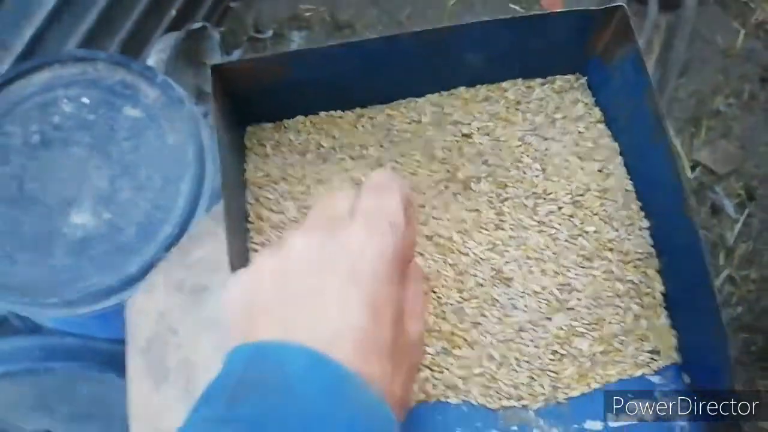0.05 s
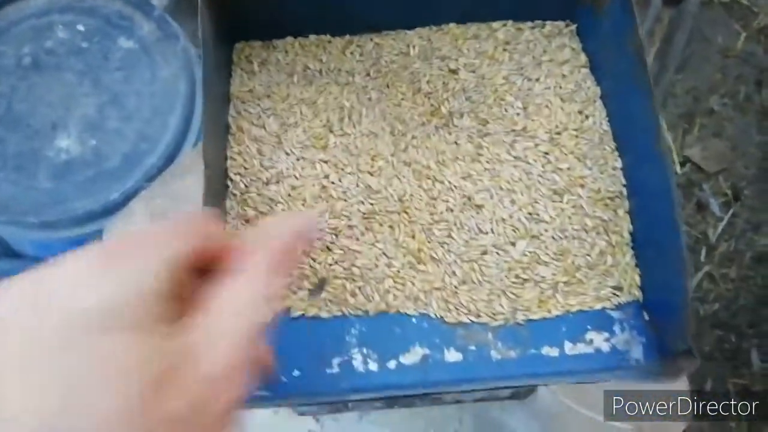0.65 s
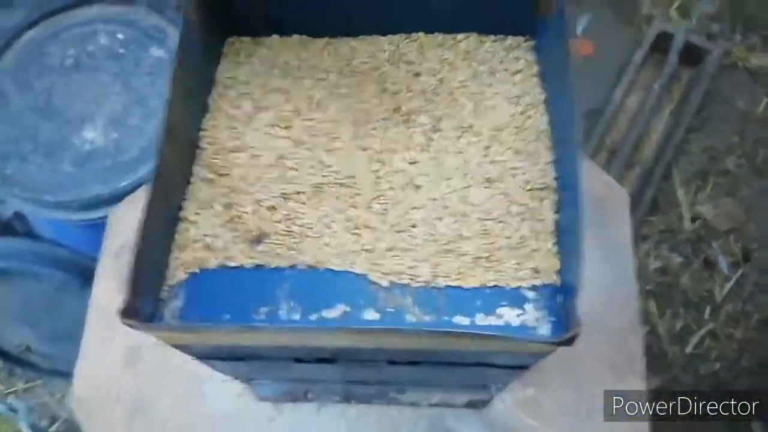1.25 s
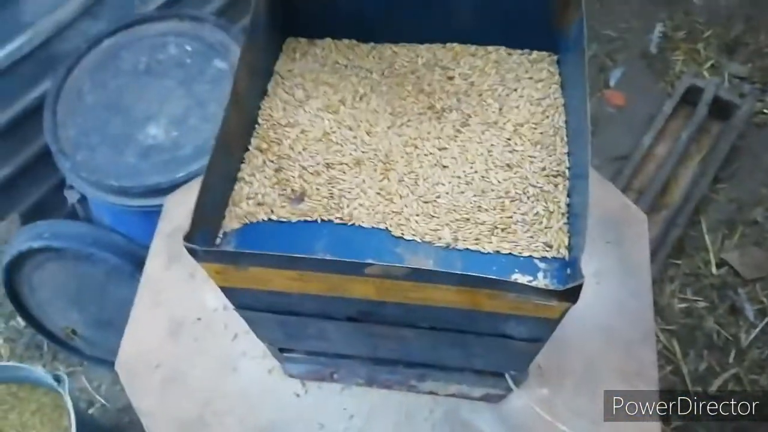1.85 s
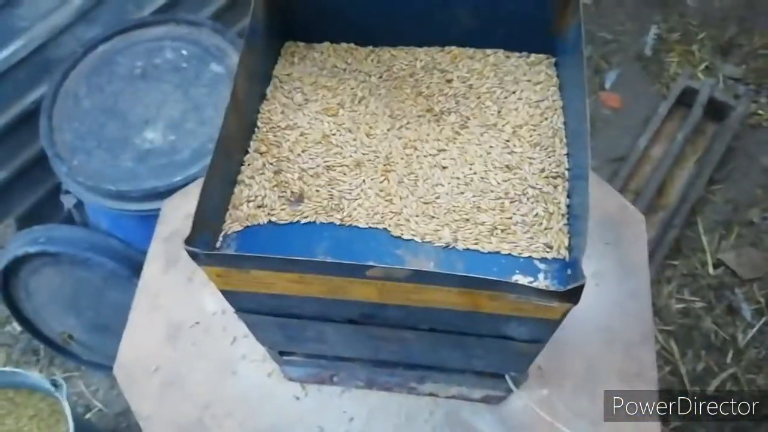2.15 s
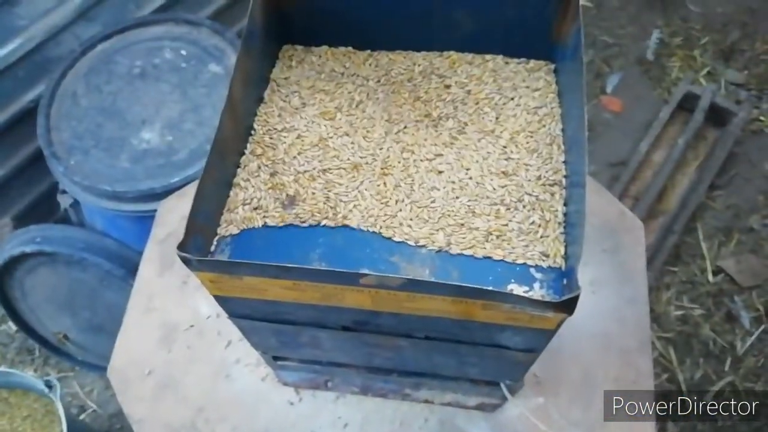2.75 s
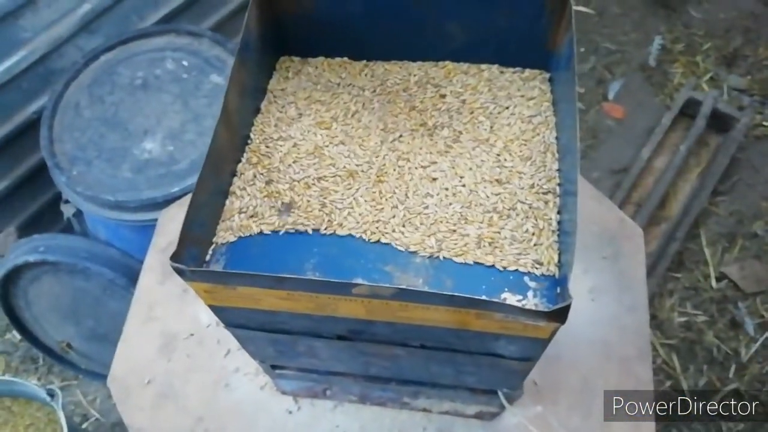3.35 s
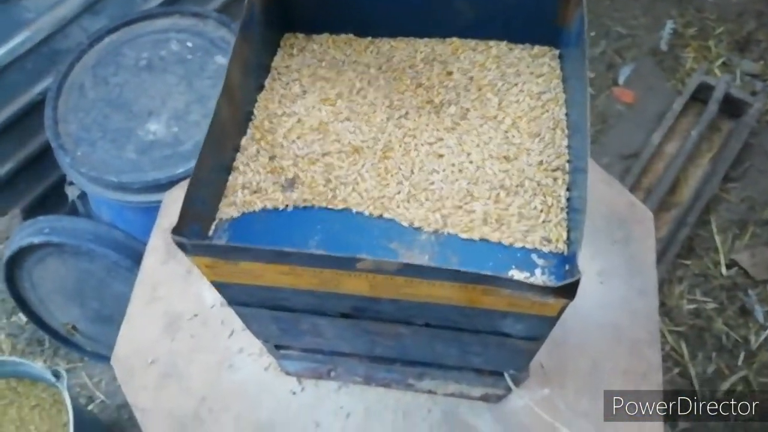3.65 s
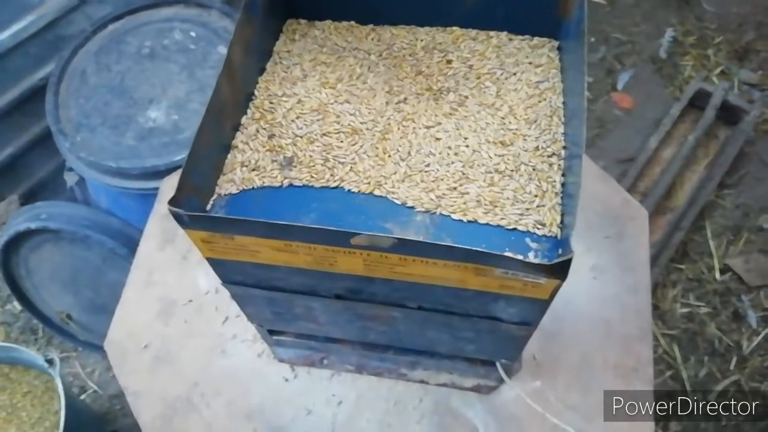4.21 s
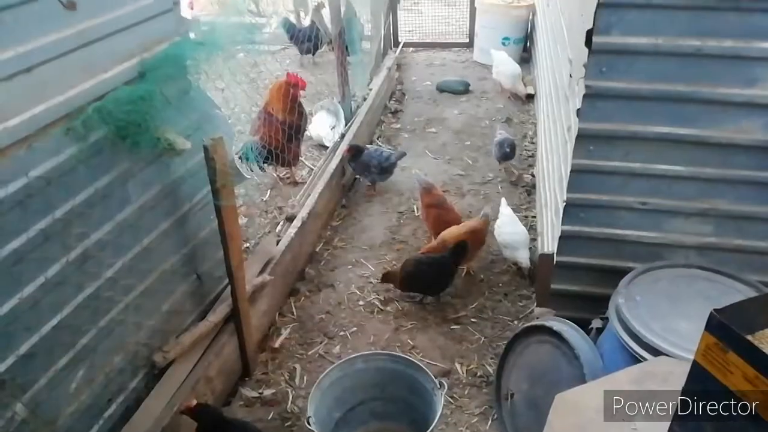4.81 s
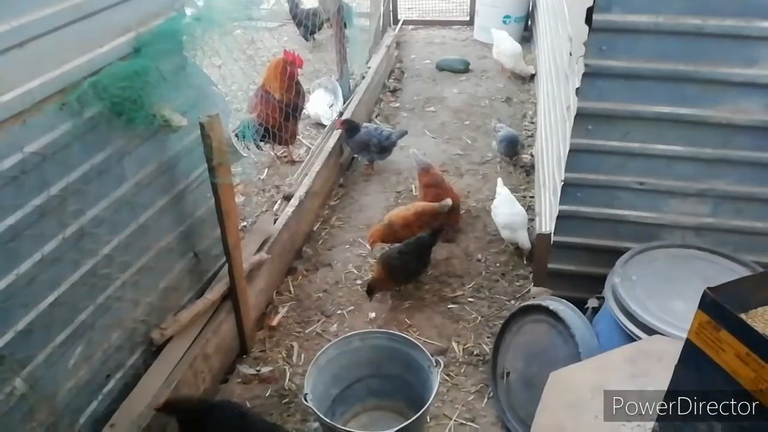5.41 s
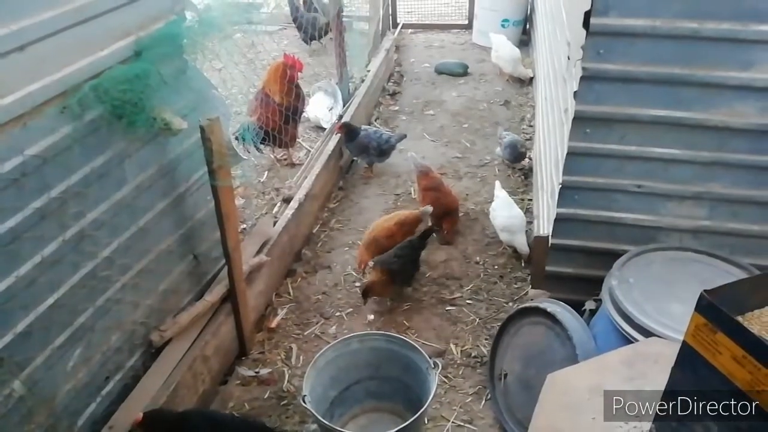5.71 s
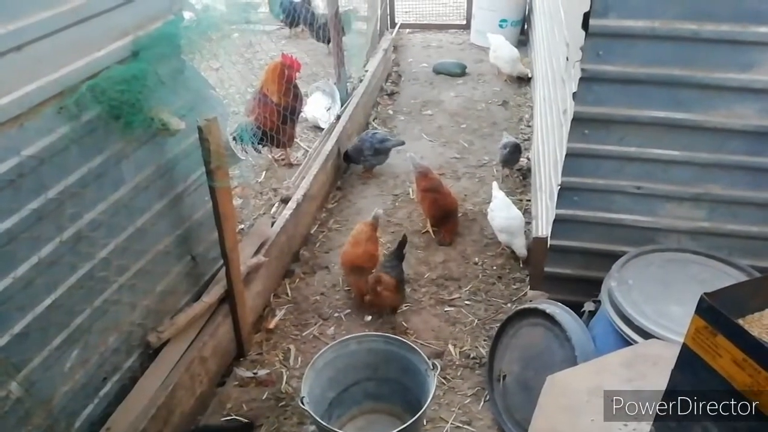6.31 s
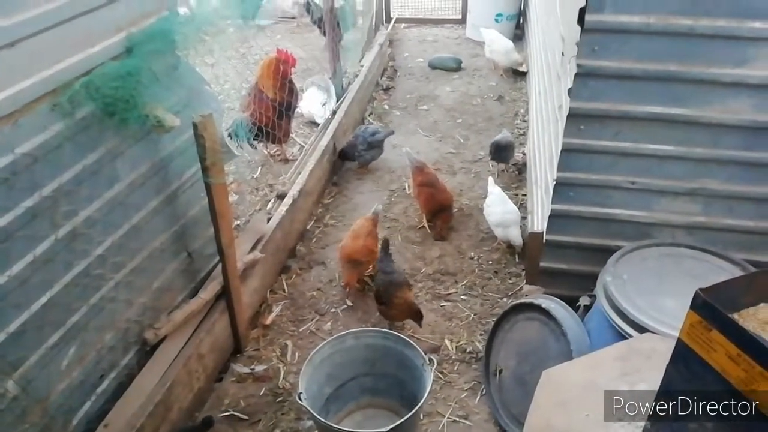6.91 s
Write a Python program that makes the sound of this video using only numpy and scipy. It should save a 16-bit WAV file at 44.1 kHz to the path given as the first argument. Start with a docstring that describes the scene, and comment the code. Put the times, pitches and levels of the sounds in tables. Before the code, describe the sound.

Heard close over the hopper, barley pelts the steel casing of a running electric mill, making a continuous hiss and fine rattle above an even droning hum. The metal rings lightly as the microphone pulls back, and the hum grows fuller. After an abrupt half-second gap, the same grinding continues from the side of the machine, with slight short echoes from the yard.

```python
"""Barley pelts the steel casing of an electric grain crusher in uneven surges, over the hum of its rotor.
The microphone starts close over the hopper in a farm yard and draws back past its ringing rim; after
half a second of silence it stands beside the machine. The beaters hum at the rate they pass, lower
under load, while kernels crack and their pieces rattle round the milling chamber. Air rumbles in the
chamber and the motor adds a faint mains buzz."""
import sys
import numpy as np
from scipy import signal
from scipy.fft import rfft, irfft
from scipy.io import wavfile
from scipy.ndimage import uniform_filter1d

SR = 44100
rng = np.random.default_rng(int(sys.argv[2]) if len(sys.argv) > 2 else 0)


def pcm_store(signal):
    """Save signal as 16-bit PCM."""
    levels = np.round(np.clip(np.atleast_2d(signal), -1, 1) * 32767)
    wavfile.write(sys.argv[1], SR, levels.astype(np.int16).T)


N = 311346
TIME = np.arange(N) / SR
BINS = np.fft.rfftfreq(N, 1 / SR)
ABOVE_END_S, BESIDE_START_S = 4.594, 5.080  # silence between the two microphone positions
BESIDE = TIME > BESIDE_START_S
SPLIT = np.array([[.5], [-.5]])  # shares a difference between left and right
USUAL_HZ = 268  # beater rate under a usual load; more grain makes it sag below this
SCREENED = (1.723, 0.12, -3.5)  # the hopper wall hides the chamber: centre_s, half_width_s, gain_db

# how close the microphone leans over the grain: time_s, closeness (0-1)
CLOSENESS = [(0, 0.62), (1.0, 0.8), (1.35, 0.14)]


def undb(db):
    """Decibels to gain."""
    return 10 ** (np.asarray(db) / 20)


def unit(x):
    """Scale to rms 1."""
    return x / np.sqrt(np.mean(x ** 2))


def over_time(points):
    """(time_s, value) points joined by straight lines."""
    return np.interp(TIME, *np.transpose(points))


def over_bins(points):
    """(frequency_hz, value) points joined on a log-frequency axis."""
    hz, value = np.transpose(points)
    return np.interp(np.log(BINS + 1), np.log(hz), value)


def band_rms(spectrum, band_hz):
    """Rms of the two channels' mean inside a band."""
    inside = (BINS > band_hz[0]) & (BINS < band_hz[1])
    return np.sqrt(2 * np.sum(abs(spectrum.mean(0)[inside]) ** 2)) / N


def wander(rate_hz):
    """A smooth random drift up to about rate_hz, rms 1."""
    return unit(irfft(rfft(rng.standard_normal(N)) / np.sqrt(1 + (BINS / rate_hz) ** 4), N))


def swell_db(centre_s, half_width_s, gain_db):
    """A bell-shaped swell or dip in level."""
    return gain_db * np.exp(-((TIME - centre_s) / half_width_s) ** 2)


def level_db(sag_hz, close_db, above_db, beside_db, db_per_hz=0):
    """A source's base level follows the microphone's position and the load on the rotor."""
    closeness = over_time(CLOSENESS)
    overhead_db = closeness * close_db + (1 - closeness) * above_db
    return np.where(BESIDE, beside_db, overhead_db) + db_per_hz * sag_hz


def kernel_bursts(per_second=70, size=.2, decay_s=.005, ceiling=.35):
    """A whole kernel bursts on a beater: the blows jump in strength and fall back within milliseconds."""
    bursts = (rng.random(N) < per_second / SR) * np.minimum(rng.exponential(size=N), 2)
    tails = signal.lfilter([1], [1, -np.exp(-1 / (decay_s * SR))], bursts)
    return 1 + np.minimum(size * tails, ceiling)


def feed(angle, surge_db=.6, clump_db=0.55, beat_depth=0.04):
    """Grain drops in by spells, surges and small clumps, and is struck as each beater passes."""
    # the feed running thin or thick: centre_s, half_width_s, gain_db
    spells = [(0, 0.086, -3), (.1, 0.043, 2), (.21, 0.044, 0.5), (.374, 0.033, -3), (.49, 0.056, -1.7),
              (.66, .06, 0.8), (.785, 0.025, -1.5), (.966, 0.03, 0.3), (1.285, 0.02, -0.3),
              (1.414, 0.064, 0.7), (1.535, 0.033, -1.3), (1.799, 0.025, -2), (2.251, 0.017, 1.8),
              (2.324, 0.019, -1.5), (2.365, .03, 1.6), (2.54, 0.021, -1.5), (2.709, 0.047, 1.1),
              (2.814, .03, -0.8), (2.985, .03, -2), (3.094, 0.031, 0.4), (3.517, 0.027, -1.5),
              (3.781, 0.026, 0.5), (3.874, .05, -0.5), (4.176, 0.039, 2.5), (4.228, 0.022, -3),
              (4.274, 0.031, 1), (5.166, 0.015, 1), (5.701, 0.036, -1.6), (5.86, 0.018, 1.5),
              (6.121, 0.037, -0.7), (6.324, 0.054, 1), (6.425, 0.034, -0.7), (6.497, 0.022, 2),
              (6.853, 0.04, -1.5), (7.01, 0.034, 1.2)]
    flow_db = sum(swell_db(*spell) for spell in spells) + surge_db * wander(26) + clump_db * wander(300)
    return undb(flow_db) * kernel_bursts() * (1 + beat_depth * np.cos(angle))


def impacts(surge, per_second=20000):
    """A hail of tiny blows of uneven size, harder in each surge."""
    hit = rng.random(N) < per_second / SR
    return hit * rng.uniform(-1.02, 1, N) * surge


def yard_echoes(hits, wall_db=-7, decay_s=0.01, dull_hz=6500, count=40):
    """Nearby walls and barrels add a short, duller spray of echoes that changes as the microphone sways."""
    size = SR // 20
    sprays = rng.standard_normal((count, size)) * np.exp(-TIME[:size] / decay_s)
    sprays /= np.sqrt(np.sum(sprays ** 2, axis=1, keepdims=True))
    sprays = signal.lfilter(*signal.butter(1, dull_hz, fs=SR), sprays)
    echoes = np.zeros(N + size)
    for part, spray in zip(np.array_split(np.arange(N), count), sprays):
        echoes[part[0]:part[-1] + size] += signal.fftconvolve(hits[part], spray)
    return hits + undb(wall_db) * echoes[:N]


def pelting(surge, gains, band_hz, lag_s=.0001):
    """Blows on a body, coloured by one gain curve from above and one from beside; rms 1 in band_hz."""
    # the recorder's stereo widening, above the hopper: frequency_hz, channel_gap_db
    widening_above = [(300, -1.5), (550, 0.5), (1000, 5), (1500, -0.5), (2500, 5.5), (4000, 3), (5500, 15),
                      (7300, 20.5), (10000, 13.5), (15500, 7)]
    # the same beside the machine: frequency_hz, channel_gap_db
    widening_beside = [(300, 0.93), (550, 0.79), (1500, 1.3), (2800, 0.85), (4000, 6.3), (5500, 15),
                       (7500, 19), (11000, 14), (15500, 5)]
    # sound that reaches both channels alike: frequency_hz, share (0-1)
    likeness = [(300, 0.5), (450, 0), (800, 0.4), (1400, 0.86), (2200, 0.1), (7000, 0.1), (11000, 0)]
    strong, unrelated = (rfft(yard_echoes(impacts(surge))) for _ in range(2))
    alike = over_bins(likeness)
    weak = alike * strong * np.exp(-2j * np.pi * BINS * lag_s) + np.sqrt(1 - alike ** 2) * unrelated
    heard = []
    # the recorder's stereo widening pushes the hiss to one side, most near 7 kHz
    for widening, gain in zip((widening_above, widening_beside), gains):
        weak_gain = undb(-over_bins(widening))
        pair = np.array([strong, weak * weak_gain]) * gain / np.sqrt(1 + weak_gain ** 2)
        heard.append(irfft(pair / band_rms(pair, band_hz), N))
    above, beside = heard
    return np.where(BESIDE, beside, above[::-1])  # strong side: right from above, left from beside


def shatter(surge, sag_hz):
    """Cracking kernels make a bright hiss that swells as the microphone clears the hopper."""
    # spectrum of the cracks: frequency_hz, gain_db
    crack_spectrum = [(3000, -32), (4300, -13), (5300, -8), (6400, -0.5), (7900, 0.5), (9200, -6),
                      (10600, -13), (13000, -15), (15500, -15)]
    db = level_db(sag_hz, close_db=-42.5, above_db=-43.5, beside_db=-43, db_per_hz=0.32)
    db += swell_db(centre_s=1.83, half_width_s=0.5, gain_db=1.3)
    colour = undb(over_bins(crack_spectrum))
    return undb(db) * pelting(surge, [colour, colour], band_hz=(5500, 12000), lag_s=.00055)


def rattle(surge, sag_hz):
    """Broken pieces rattle round the chamber, briefly screened by the hopper wall."""
    # spectrum of the flying pieces: frequency_hz, gain_db
    rattle_spectrum = [(100, -46.5), (250, -26.5), (390, -18.5), (460, -5), (650, -2.5), (1200, -1.5),
                       (1950, -2), (2400, 0.5), (3100, 2), (3900, -0.5), (5300, -2.5), (8000, -28.5)]
    db = level_db(sag_hz, close_db=-49.5, above_db=-51, beside_db=-50.5) + swell_db(*SCREENED)
    colour = undb(over_bins(rattle_spectrum))
    return undb(db) * pelting(surge, [colour, colour], band_hz=(2300, 4200))


def casing(surge, sag_hz, spurt_db=0.55):
    """The pelted steel casing rings in spurts, louder under load."""
    # modes of the casing: pitch_hz, width_hz, above_db, beside_db
    casing_modes = [(460, 37, -9.5, -36), (592, 28, -12, -16), (798, 35, -4.5, -11.5), (1053, 69, -4, -11),
                    (1276, 24, -4.5, 3.5), (1361, 54, 0.5, -1.5), (1470, 110, -5, -5), (1558, 60, -5, 2),
                    (1880, 20, -7.5, -1)]
    pitch_hz, width_hz, *positions_db = np.transpose(casing_modes)[:, :, None]
    power = 1 / (1 + ((BINS ** 2 - pitch_hz ** 2) / (width_hz * BINS + 1)) ** 2)
    colours = [np.sqrt(np.sum(power * undb(mode_db) ** 2, axis=0)) for mode_db in positions_db]
    db = level_db(sag_hz, close_db=-49.5, above_db=-52, beside_db=-47, db_per_hz=0.63)
    return undb(db + spurt_db * wander(5.4)) * pelting(surge, colours, band_hz=(1150, 1700))


def brighten(grain, closeness, gain=0.59, corner_hz=9500):
    """Close over the grain the highest hiss reaches the microphone more directly."""
    highpass = 1 - 1 / (1 + (BINS / corner_hz) ** 10)
    return grain + gain * closeness * irfft(rfft(grain) * highpass, N)


def hopper(surge, spurt_db=1.4, near_side_db=6):
    """Kernels ring the hopper's steel sheets in spurts; each mode swells as the microphone passes it."""
    # sheet modes: pitch_hz, width_hz, above_db, beside_db, passed_at_s, half_width_s, swell_db
    hopper_modes = [ (1900, 400, -73, -70, 1.68, .3, 22), (2740, 70, -65, -59.5, 1.4, .3, 3),
                    (2982, 20, -69, -70, 1.25, .65, 10), (3510, 24, -65, -66, 1.4, .12, 9),
                    (4325, 45, -72, -59.5, 1.48, .1, 8), (4398, 36, -60.5, -73, 1.5, .09, 11),
                    (4700, 25, -74, -73, .35, .62, 15), (4910, 38, -61, -57, .35, .62, 9),
                    (5440, 20, -74, -77, .95, .85, 13), ]
    blows = np.array([impacts(surge), impacts(surge)])
    sheets = 0
    for pitch_hz, width_hz, above_db, beside_db, *spot in hopper_modes:
        ring = unit(signal.lfilter(*signal.iirpeak(pitch_hz, pitch_hz / width_hz, fs=SR), blows))
        sheets += ring * undb(np.where(BESIDE, beside_db, above_db) + swell_db(*spot))
    pan_db = near_side_db * np.where(BESIDE, 1, -1) * SPLIT
    rim_db = swell_db(centre_s=1.45, half_width_s=.15, gain_db=3.5)
    return sheets * undb(pan_db + rim_db + swell_db(*SCREENED) + spurt_db * wander(4))


def rotor_hum(angle, sag_hz, waver_db=0.7, rough_db=1.0, light_run_hz=268.1, drawn_back_s=3.1):
    """Each passing beater leaves a dip of pressure; kernels in its path roughen the upper partials most."""
    # partials of the hum: harmonic, close_db, above_db, beside_db, sag_db_per_hz
    partials = [(1, -34.5, -34.5, -36.5, -0.5), (2, -51, -50.5, -59.5, 1), (3, -66, -66.5, -67.5, -0.5),
                (4, -52.5, -70, -54, 2.5), (8, -81.5, -68, -64.5, 2.5)]
    # left against right: harmonic, above_pan_db, above_lead_rad, beside_pan_db, beside_lead_rad
    stereo_image = [(1, -.7, 0.5, 1.1, 0.18), (2, -8, -1.28, 6, 1), (3, -23.5, 2, 5, -0.93),
                    (4, -0.5, 1.1, 0, -1.9), (8, -5.5, 0.5, 28, 1)]
    over_hopper_db = -8 * np.maximum(1 - TIME / drawn_back_s, 0)
    overspeed_hz = np.maximum(USUAL_HZ - sag_hz - light_run_hz, 0)
    # harmonics 1 and 8 swell at the hopper's rim; the octave grows when the rotor runs light
    change_db = {1: over_hopper_db + 0.59 * swell_db(*SCREENED) + swell_db(1.33, .17, 2.2),
                 2: 2.5 * overspeed_hz,
                 8: swell_db(1.55, .38, 6.5)}
    hum = 0
    for (harmonic, *levels), (_, *image) in zip(partials, stereo_image):
        above_pan_db, above_lead, beside_pan_db, beside_lead = image
        pan_db = SPLIT * np.where(BESIDE, beside_pan_db, above_pan_db)
        lead = SPLIT * np.where(BESIDE, beside_lead, above_lead)
        db = level_db(sag_hz, *levels) + change_db.get(harmonic, 0)
        flutter_db = min(waver_db * harmonic ** 2, rough_db) * wander(25)
        hum -= np.sqrt(2) * undb(db + flutter_db + pan_db) * np.cos(harmonic * angle + lead)
    return hum


def chamber_air(closeness, base_db=-54.0, close_db=4, beside_db=-0.5, gust_db=2, side_db=-17):
    """Turbulence rumbles in the chamber, nearly alike in both channels and loudest close over the grain."""
    # spectrum of the turbulence: frequency_hz, gain_db
    air_spectrum = [(20, -31.5), (45, -30), (66, -17.5), (85, -18), (145, -17), (185, -9), (212, -4),
                    (232, 3), (252, -1.5), (285, 2.5), (325, -7), (390, -14.5), (600, -31.5)]
    colour = undb(over_bins(air_spectrum))
    mid, side = (unit(irfft(rfft(rng.standard_normal(N)) * colour, N)) for _ in range(2))
    side *= undb(side_db)
    db = base_db + close_db * closeness + beside_db * BESIDE + gust_db * wander(14)
    return undb(db) * np.array([mid + side, mid - side])


def motor_buzz(buzz_db=-76, mains_hz=50):
    """The motor's iron buzzes at twice the mains frequency."""
    return np.sqrt(2) * undb(buzz_db) * np.sin(2 * np.pi * 2 * mains_hz * TIME)


def scene():
    """The running crusher from above, then from beside, with silence between."""
    # the rotor's speed, one list for each microphone position: time_s, beater_rate_hz
    rotor_speed = [
        [(0.05, 266.0), (3.02, 265.7), (3.3, 267.7), (4.55, 268.8)],
        [(5.12, 268.9), (6.652, 268.6), (6.95, 272.8), (7.03, 272.7)],
    ]
    rate_hz = over_time(np.vstack(rotor_speed))
    sag_hz = USUAL_HZ - rate_hz
    angle = 2 * np.pi * np.cumsum(rate_hz * (1 + 0.0011 * wander(10.3))) / SR
    closeness = over_time(CLOSENESS)
    surge = feed(angle)
    grinding = shatter(surge, sag_hz) + rattle(surge, sag_hz) + casing(surge, sag_hz)
    grain = brighten(grinding, closeness) + hopper(surge)
    machine = grain + rotor_hum(angle, sag_hz) + chamber_air(closeness) + motor_buzz()
    audible = (TIME < ABOVE_END_S) | BESIDE
    return machine * uniform_filter1d(audible.astype(float), size=64)


def record(dry):
    """The recorder cuts the treble steeply above 15.55 kHz."""
    return signal.sosfilt(signal.ellip(10, .1, 80, 15550, fs=SR, output="sos"), dry)


dry = scene()
out = record(dry)
pcm_store(out)
```